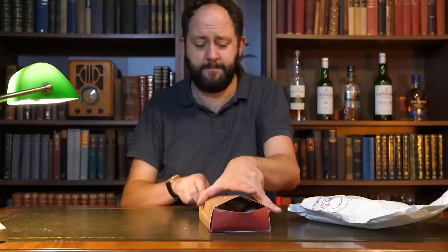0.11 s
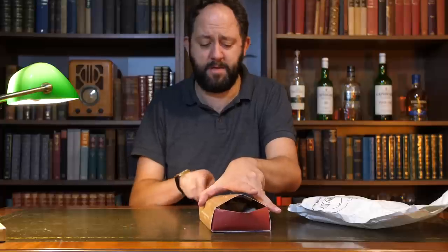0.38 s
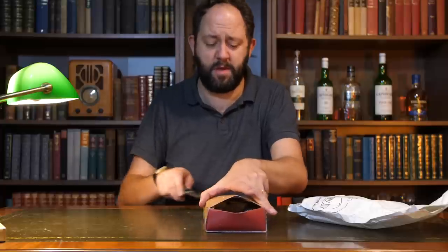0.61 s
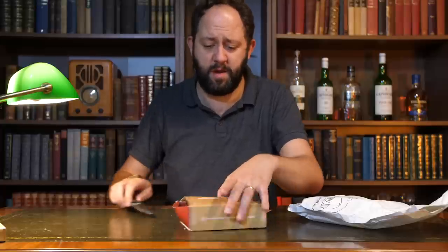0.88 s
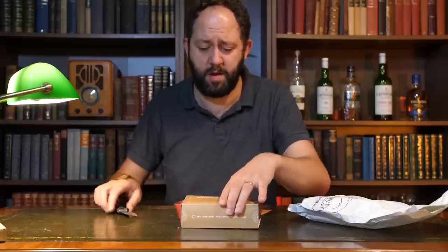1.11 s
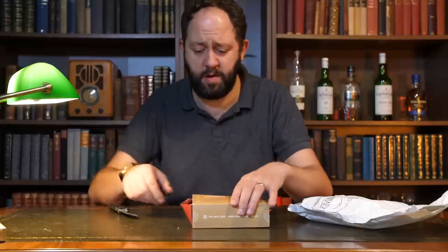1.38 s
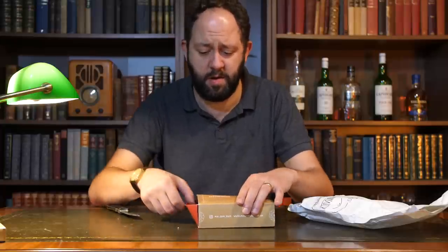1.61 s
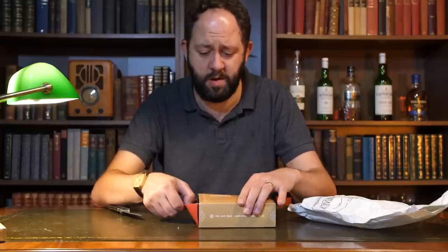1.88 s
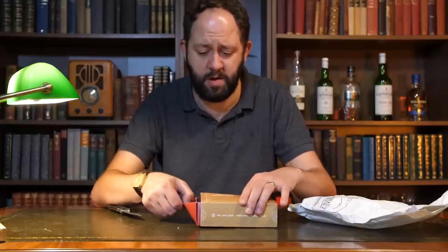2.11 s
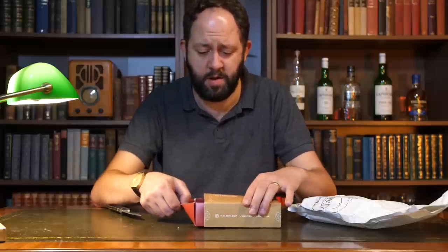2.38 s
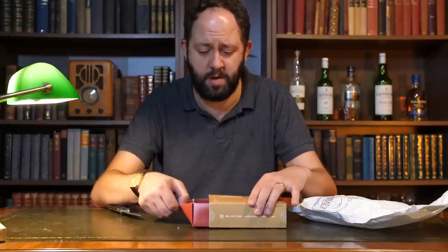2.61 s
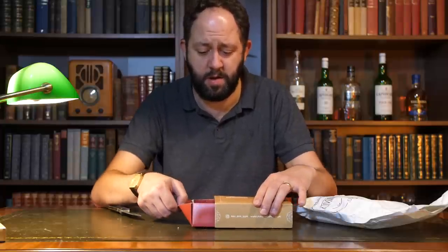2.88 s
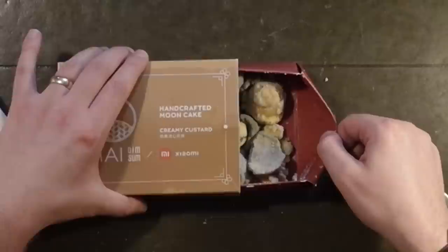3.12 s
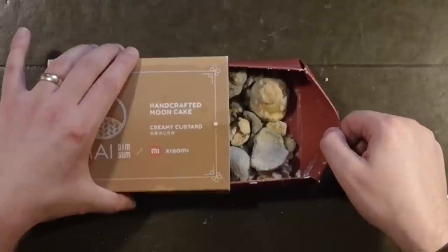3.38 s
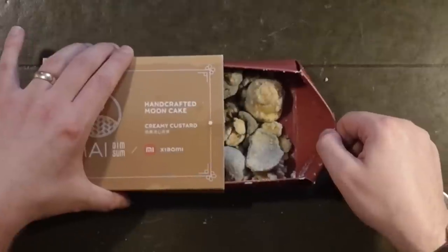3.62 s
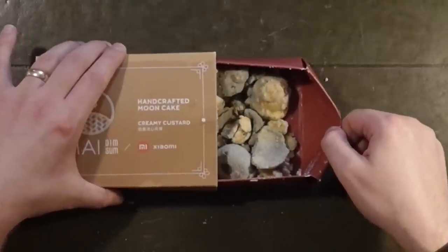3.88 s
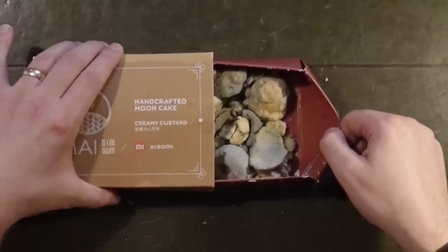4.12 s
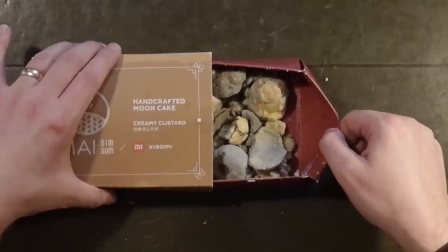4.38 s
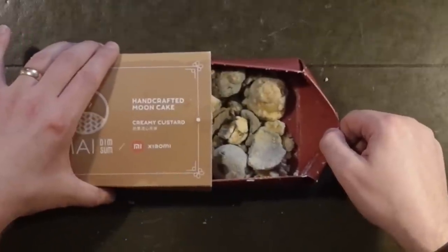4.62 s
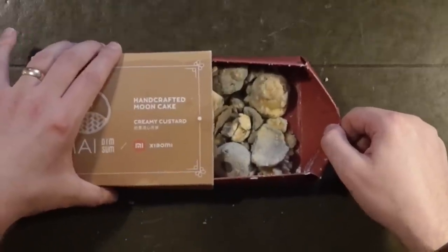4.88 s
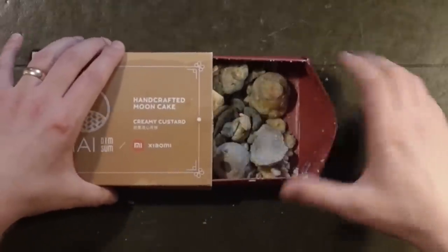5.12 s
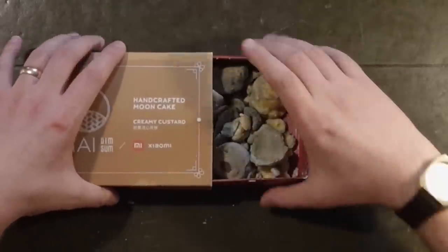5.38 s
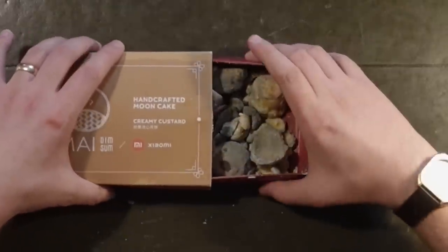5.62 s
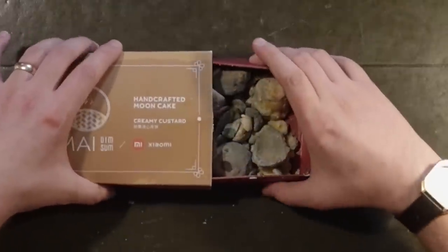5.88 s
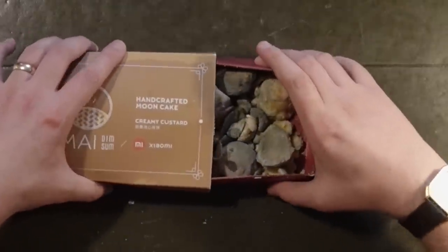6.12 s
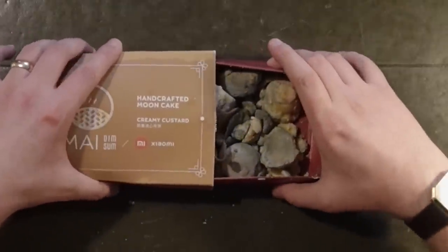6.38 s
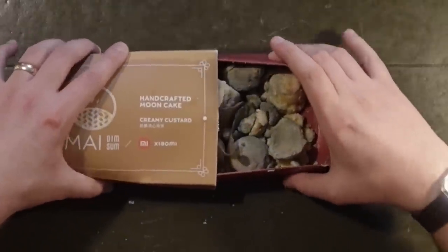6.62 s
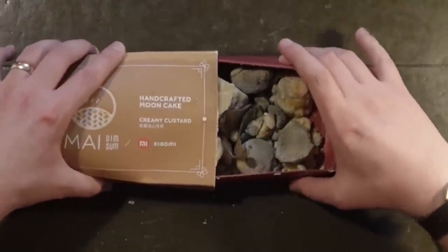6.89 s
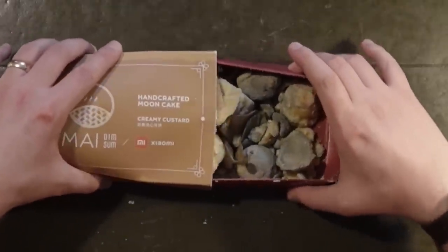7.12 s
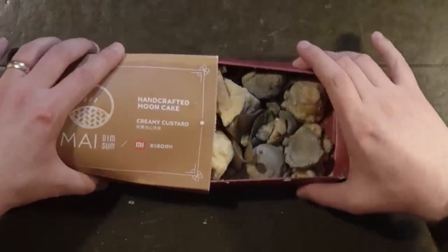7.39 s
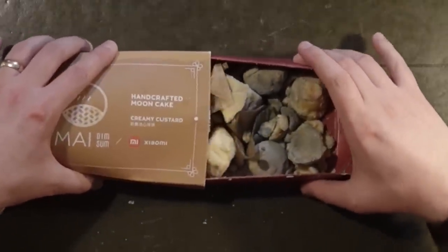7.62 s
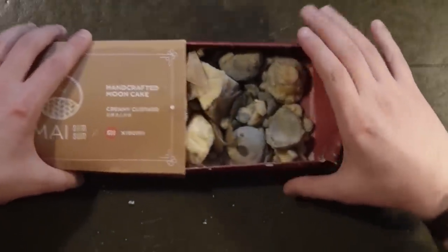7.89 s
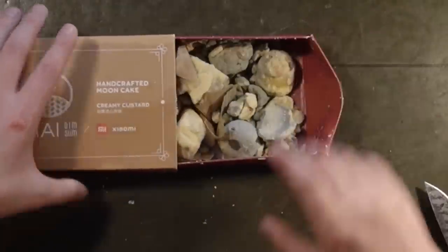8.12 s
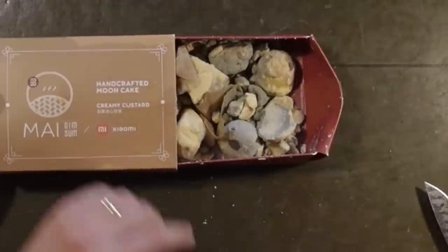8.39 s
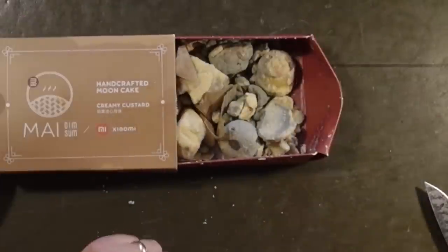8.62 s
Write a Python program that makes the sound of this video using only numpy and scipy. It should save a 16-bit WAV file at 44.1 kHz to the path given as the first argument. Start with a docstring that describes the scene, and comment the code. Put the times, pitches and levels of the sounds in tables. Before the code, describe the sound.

Close up on a wooden desk, a cardboard box is handled with airy rubbing and light taps, then lands with a low woody thud and rattle. Quiet card scuffs follow. Sharp catches and short scrapes then come in bursts as a tight tray slides out, ending in a cluster of clicks and a rising creak before near silence. Short room tail, low hiss, faint electronic whine.

```python
"""Cardboard box and sliding tray

A cardboard box is turned and set down on a wooden desk, then its tray is pulled out of the sleeve in jerks.
Rubbed card is noise shaped by resonances; catches, squeaks and a creak are slips ringing the card.
Blows and leaning hands excite the desk as decaying modes, a rattle, a low shake and a hum.
A fingertip drags over a flap, a short room tail follows, and steady hiss and a faint whine lie beneath."""
import sys
import numpy as np
from scipy import signal
from scipy.fft import rfft, irfft
from scipy.io import wavfile
from scipy.ndimage import uniform_filter1d

SR = 44100
rng = np.random.default_rng(int(sys.argv[2]) if len(sys.argv) > 2 else 0)


def store_pcm(level_fs):
    """Save levels as 16-bit WAV."""
    pcm = np.round(np.clip(level_fs, -1, 1) * 32767).astype(np.int16)
    wavfile.write(sys.argv[1], SR, np.atleast_2d(pcm).T)


def elevation(decibels):
    """Turn decibel levels (scalar or array-like) into linear amplitude ratios."""
    levels = np.asarray(decibels, float)
    return 10 ** (levels / 20)


N = 386316  # length in samples

# Resonances of the rubbed card, tray deep in the sleeve and half way out.
# Each row: frequency in Hz, width in Hz, relative level in dB (the deep curve is sharpened later).
DEEP_RINGS = [(680, 220, -5.5), (1900, 670, 3.5), (2800, 720, 6), (4130, 350, 4.5), (4920, 1000, -1.5)]
OUT_RINGS = [(1800, 610, 6.5), (2930, 400, 4.5), (4190, 1160, 0)]
# Resonances of the paper surface. Each row: frequency in Hz, width in Hz, relative level in dB.
PAPER_FIZZ = [(6450, 870, -2), (7700, 1200, -2), (12580, 1600, -7.5)]
# Hands turn the box on the desk; pressing sounds hollow, skimming airy.
# Each row: time in seconds, level in dB, pressure from 0 to 1.
TURN = [(0.0, -75.5, 0.98), (0.4, -51, 0.91), (0.52, -59, 0.81), (0.68, -62, 0.37), (0.85, -59, 0.3),
        (1.05, -67, 0.2), (1.45, -66, 0.1), (1.7, -72, 0.62), (1.9, -94, 0.63)]
# The tray slides for a while.
# Each row: start in seconds, length in seconds, first level in dB, last level in dB, panel ring in Hz.
SLIDES = [(2.104, 1, -61.5, -75.5, 2215), (3.285, 0.16, -62, -48.5, 1980), (3.8, 0.15, -46, -44.5, 1980),
          (5.028, 0.029, -59.5, -60, 1700), (6.157, 0.052, -45, -43.5, 1940),
          (6.337, 0.075, -50.5, -45.5, 1700), (6.577, 0.043, -44.5, -44.5, 2750),
          (6.762, 0.029, -43.5, -46.5, 3270), (7.257, 0.11, -45.5, -56.5, 1900),
          (7.462, 0.1, -44, -47.5, 2320), (7.767, 0.182, -65, -42, 2400)]
# Short scuffs of the card. Each row: time of the peak in seconds, rise over 20 dB in ms (at least 3 is used),
# fall over 20 dB in ms, peak level in dB, panel ring in Hz.
SCUFFS = [(0.485, 200, 31, -53.5, 1360), (0.574, 150, 206, -52, 1470), (0.916, 137, 185, -54.5, 3145),
          (1.95, 179, 111, -61.5, 1390), (2.18, 145, 248, -62, 1750), (2.47, 249, 210, -57, 2600),
          (2.67, 222, 296, -57, 2580), (3.08, 900, 38.5, -59, 1934), (3.584, 359.5, 303, -66.5, 1980),
          (4.1, 417, 460, -64.5, 1890), (4.132, 15, 50, -44.5, 1890), (4.949, 64, 402, -70, 2174),
          (5.285, 51, 210, -70, 1900), (5.447, 85, 500, -66.5, 2630), (6.026, 83, 78, -55.5, 1050),
          (6.808, 2.5, 53, -31, 3030), (6.96, 35, 69, -41, 2700), (7.146, 30, 39, -36.5, 1900),
          (7.223, 200, 32, -51.5, 1630), (7.615, 59, 78, -45, 1830), (7.911, 266, 76, -51, 2640),
          (8.075, 207, 63, -50.5, 2820), (8.244, 10, 33, -56, 2510)]
# Hands lean on the desk. Each row: time in seconds, level of the low shake in dB, level of the hum in dB.
LEAN = [(0, -63, -73.5), (.34, -63, -45), (.5, -57, -37.5), (.9, -60.5, -70), (1.7, -65, -60.5),
        (2.3, -74.5, -86.5), (2.9, -75, -81), (3.2, -70, -72), (4.2, -56, -71.5), (4.5, -72, -75),
        (5.9, -63, -72), (6.25, -53.5, -50.5), (7.1, -53, -64.5), (7.5, -62, -63), (8.25, -64.5, -74),
        (8.76, -73, -77.5)]
# Low resonances of the shaken desk. Each row: frequency in Hz, width in Hz, relative level in dB.
DESK_SHAKE = [(54.7, 10, -4.5), (111.5, 8.7, -9)]
# Box and hand land on the desk.
# Each row: time in seconds, peak in dB before the low cut, nominal contact time in ms.
THUMPS = [(0.245, -37.5, 0.11), (0.391, -28, 0.16), (0.439, -32.5, 0.17), (0.477, -27, 0.07),
          (0.709, -45, 0.23), (1.017, -24.5, 0.45), (1.064, -11.5, 0.39), (1.086, -7, 0.18),
          (1.616, -53, 0.44)]
# Modes of the desk. Each row: frequency in Hz, mean relative level in dB, t60 in seconds.
DESK_MODES = [(75.6, -5.5, 0.5), (99, -5, 0.42), (119.1, 1.5, 0.18), (151.95, 3, 0.73), (160, -10.5, 1.2),
              (282, -5, 0.22), (372, -2.5, 0.15), (472.7, -6.5, 0.26), (614, -8, 0.14), (849, -11, 0.14)]
# Dense rattle of box and contents after a thump.
# Each row: frequency in Hz, then relative level in dB (first table) or t60 in seconds (second).
RATTLE_LEVEL = [(50, -69.5), (100, 1.5), (400, 8), (1000, 2.5), (2000, -2), (5000, -31)]
RATTLE_T60 = [(100, 0.27), (300, 0.18), (1500, 0.15)]
# The card catches and lets go. Each row: time in seconds, peak in dB, main ring in Hz.
SNAPS = [(0.392, -26.5, 1460), (0.393, -18, 455), (0.474, -25.5, 650), (0.709, -34, 620),
         (0.911, -36, 2480), (1.086, -25.5, 720), (1.448, -43.5, 2560), (1.629, -47.5, 1258),
         (2.103, -44.5, 1560), (3.126, -52.5, 1900), (3.261, -45, 1610), (3.574, -21, 1800),
         (3.804, -34.5, 930), (4.122, -18.5, 1800), (4.305, -36, 920), (4.731, -45, 1466),
         (5.058, -43, 1200), (5.291, -41, 1980), (5.511, -39.5, 1240), (5.82, -39.5, 1020),
         (6.156, -36, 1570), (6.343, -28, 1380), (6.576, -20.5, 1900), (6.764, -34, 1440),
         (7.061, -38.5, 1440), (7.168, -26, 1700), (7.468, -28.5, 1800), (7.583, -30, 1800),
         (7.599, -28, 1560), (7.61, -32, 1800), (7.648, -29, 1800), (7.661, -27.5, 1770),
         (7.998, -28, 1160), (8.127, -45.5, 615)]
# Rings of a snap. Each row: frequency and width as multiples of the main ring,
# relative level in dB before the snap's strength and sharpening act on it.
CARD_RINGS = [(0.501, 0.24, -16.5), (0.998, 0.32, 3.5), (1.746, 0.51, -6.5), (2.302, .6, -3),
              (4.3, 0.49, -2.5), (7.001, 1.5, -16.5)]
# An edge jams and squeaks, falling in pitch.
# Each row: start in seconds, length in seconds, relative level in dB, first and last pitch in Hz.
SQUEAKS = [(3.454, 0.0083, -34, 1900, 1530), (3.953, 0.017, -25, 1800, 788), (4.132, 0.017, -27, 1057, 900),
           (4.148, 0.0089, -27.5, 2050, 1530), (6.806, 0.0155, -34, 3350, 3065),
           (6.808, 0.023, -33, 2310, 1670)]
# A fingertip drags over a loose flap.
# Each row: start in seconds, length in seconds, rms level in dB before the fades.
DRAGS = [(4.841, 0.052, -52.5), (5.728, 0.14, -54.5)]
# Modes of the flap. Each row: frequency in Hz, width in Hz, relative level in dB before sharpening.
FLAP_MODES = [(623, 110, -1), (985, 120, -1), (1710, 540, 1.5)]
# Stick and slip of the tray. Each row: time in seconds, slips per second, mean peak of a bare slip in dB.
CREAK = [(7.7645, 62, -26), (7.8, 88, -30.5), (7.855, 110, -26.5), (7.883, 230, -31.5), (7.905, 290, -28.5),
         (7.93, 200, -33), (7.96, 130, -39)]
# Tray and paper surface join the creak. Each row: frequency in Hz, width in Hz, level in dB re the slips.
CREAK_BODY = [(270, 100, 9.5), (13600, 1700, 5)]
# Decay of the room. Each row: frequency in Hz, t60 in seconds.
ROOM_T60 = [(200, 0.41), (2000, 0.13), (12000, 0.16)]
# Spectra of the common hiss and of the opposed part. Each row: frequency in Hz, relative density in dB.
HISS_SPECTRUM = [(76, -31.5), (130, -12.5), (589, -18), (1080, -26), (3910, -27), (16000, -26.5)]
SIDE_SPECTRUM = [(100, -5.5), (1030, -11), (16000, -3)]
# Hiss and whine dip briefly. Each row: centre in seconds, half length in seconds, depth in dB.
HISS_DIPS = [(2.043, .05, -5.5), (3.193, 0.19, -6)]

OUT_S = 3.607  # the tray starts to sound half way out (s)
TURNED_S, AIR_DB = 1.5, -2  # hands slide over the glossy box until here (s), with this much more air (dB)
TURN_RING_HZ = 1700
HOLLOW_DB, AIRY_DB = (-17.5, 10), (-1.5, -14)  # body and fizz re level, skimming and pressed
ATTACK_S, STOP_DB_PER_S = 0.018, 493.5
SETTLE_DB, SETTLE_DB_PER_S = -13.5, 132  # after a slide the card creeps on, softly
MEDIUM_DB, MEDIUM_HZ = -50, 1900  # reference stroke
BODY_DB, FIZZ_DB = (-12.5, -6), (-14, -12)  # re level in a medium stroke, tray deep and half way out
BODY_SLOPE, FIZZ_SLOPE = -0.29, -0.088  # dB gained per dB of a stronger stroke
BODY_DB_PER_OCTAVE, FIZZ_DB_PER_OCTAVE = -4.5, 4  # a slacker panel rings lower, hollower and duller
HUM_HZ, HUM_WIDTH_HZ = 157.6, 5.8
DESK_LOW_HZ = 66.4  # the desk radiates little below this
CREAK_HZ = 1800
ROOM_DB = -13.5
MIC_LOW_HZ = 41.4
HISS_DB, SIDE_DB = -70.5, -75  # rms outside the dips
WHINE_HZ = 1000.3
WHINE_DB, WHINE_FALL_DB = -84, -0.2014  # level, and change per square of the multiple


def evened(x):
    """Normalisation: scales a signal to rms 1."""
    return x / np.sqrt(np.mean(x ** 2) + 1e-20)


def read(points, hz):
    """Interpolation of a table on a logarithmic frequency axis."""
    f, value = np.transpose(points)
    return np.interp(np.log(hz + 1), np.log(f + 1), value)


def add(mix, s, sound):
    """Superposition: adds a sound to the mix at s seconds."""
    part = mix[round(s * SR):][:len(sound)]
    part += sound[:len(part)]


def coloured(x, gain):
    """Linear filtering: multiplies the spectrum by a gain given as a function of Hz."""
    return irfft(rfft(x) * gain(np.fft.rfftfreq(len(x), 1 / SR)), len(x))


def peaks(modes):
    """Resonance: the powers of several resonance curves add."""
    return lambda hz: np.sqrt(sum(elevation(db) ** 2 / (1 + (2 * (hz - f) / w) ** 2) for f, w, db in modes))


def between(lo_hz, hi_hz):
    """Band limiting: gain curve of a band with steep sides."""
    return lambda hz: 1 / np.sqrt((1 + (lo_hz / (hz + 1)) ** 8) * (1 + (hz / hi_hz) ** 8))


def curve(rows, column):
    """Linear interpolation: one column of a table at every sample."""
    rows = np.array(rows)
    return np.interp(np.arange(N) / SR, rows[:, 0], rows[:, column])


def resonate(x, hz, width):
    """Heterodyning: a resonance follows the curve hz by shifting down, smoothing and shifting back."""
    turn = np.exp(2j * np.pi * np.cumsum(hz) / SR)
    r = np.exp(-np.pi * width / SR)
    return 2 * (turn * signal.lfilter([1 - r], [1, -r], x / turn)).real


def slide_shape(t, s, length, first_db, last_db):
    """Sliding friction: level in dB rises at the start, drifts while held, then stops and settles."""
    held_db = np.interp(t, [s - 4 * ATTACK_S, s - ATTACK_S, s + ATTACK_S, s + length],
                        [-140, first_db - 32, first_db, last_db])
    after = np.maximum(t - s - length, 0)
    fall_db = np.maximum(-STOP_DB_PER_S * after, SETTLE_DB - SETTLE_DB_PER_S * after)
    return held_db + fall_db * (after > 0)


def scuff_shape(t, s, rise_ms, fall_ms, db):
    """Exponential growth and decay: level in dB climbs straight to its peak and falls straight."""
    before = (s - t) / max(rise_ms / 1000, .003)
    after = (t - s) / max(fall_ms / 1000, .003)
    return db - 20 * np.maximum(before, after)


def stroke_colour(s, db, hz):
    """Radiation of a panel: body and fizz in dB depend on stroke strength, ring and tray position."""
    stronger_db, octaves = db - MEDIUM_DB, np.log2(hz / MEDIUM_HZ)
    body_db = BODY_DB[int(s > OUT_S + .2)] + BODY_SLOPE * stronger_db + BODY_DB_PER_OCTAVE * octaves
    fizz_db = FIZZ_DB[int(s > OUT_S)] + FIZZ_SLOPE * stronger_db + FIZZ_DB_PER_OCTAVE * octaves
    return body_db, fizz_db, hz


def strokes():
    """Power addition: stroke powers sum, and weight body, fizz and panel ring, at every sample."""
    t = np.arange(0, N / SR + .002, .001)
    shapes, colours = [], []
    for s, length, first_db, last_db, hz in SLIDES:
        shapes.append(slide_shape(t, s, length, first_db, last_db))
        colours.append(stroke_colour(s, max(first_db, last_db), hz))
    for s, rise_ms, fall_ms, db, hz in SCUFFS:
        shapes.append(scuff_shape(t, s, rise_ms, fall_ms, db))
        colours.append(stroke_colour(s, db, hz))
    power = [elevation(shape) ** 2 for shape in shapes]
    stroke_power = np.sum(power, 0)
    body_db, fizz_db, ring_hz = np.transpose(colours) @ power / (stroke_power + 1e-30)

    s, turn_db, pressure = np.transpose(TURN)
    turn_power = elevation(np.interp(t, s, turn_db, right=-140)) ** 2
    pressure = np.clip(np.interp(t, s, pressure), 0, 1)
    total = stroke_power + turn_power
    turning = t < s[-1]
    body_db[turning] = np.interp(pressure, (0, 1), HOLLOW_DB)[turning]
    fizz_db[turning] = np.interp(pressure, (0, 1), AIRY_DB)[turning]
    ring_hz += turn_power / total * (TURN_RING_HZ - ring_hz)
    curves = (10 * np.log10(total), body_db, fizz_db, ring_hz)
    return [np.interp(np.arange(N) / SR, t, values) for values in curves]


def fibre_slips():
    """Random excitation: countless tiny fibre slips, bunched in time and patchy in colour."""
    size = elevation(3.5 * np.minimum(rng.exponential(1, N), 4)) * (rng.random(N) < 2000 / SR)
    clumps = elevation(1.2 * evened(uniform_filter1d(rng.standard_normal(N), 300)))
    slips = clumps * (0.49 * evened(size * rng.standard_normal(N)) + rng.standard_normal(N))
    z = signal.stft(slips, nperseg=256, noverlap=192)[2]
    patches = uniform_filter1d(rng.standard_normal(z.shape[::-1]).T, 3, 0)
    patches = uniform_filter1d(patches, 14, 1)
    # the rubbed spot keeps changing colour
    return signal.istft(z * elevation(2.6 * evened(patches)), nperseg=256, noverlap=192)[1][:N]


def rub():
    """Friction noise: fibre slips excite the card; sleeve, body and fizz follow the stroke."""
    slips = fibre_slips()
    level_db, body_db, fizz_db, ring_hz = strokes()
    out_share = np.clip((np.arange(N) / SR - OUT_S) / 1.07, 0, 1)
    deep = coloured(slips, lambda hz: peaks(DEEP_RINGS)(hz) ** 1.2)
    card = (1 - out_share) * deep + out_share * coloured(slips, peaks(OUT_RINGS))
    # the held panel bends, so its ring wanders
    flex = 1 + 0.033 * evened(uniform_filter1d(rng.standard_normal(N), 900))
    card += resonate(slips, ring_hz * flex, 520)

    turning = np.clip((TURNED_S - np.arange(N) / SR) / 0.11, 0, 1)
    broad = np.maximum(turning, 0.14 + out_share)  # deep in the sleeve its own low ring stands out
    bands = [(card, 900, 6000),
             (broad * slips + elevation(-9.5) * card, 200, 900),
             (coloured(slips, peaks(PAPER_FIZZ)), 6000, 15800)]
    parts = (coloured(part, between(lo_hz, hi_hz)) for part, lo_hz, hi_hz in bands)
    # each band is levelled over a quarter second
    sleeve, body, fizz = (part / np.sqrt(uniform_filter1d(part ** 2, SR // 4)) for part in parts)
    fizz += turning * elevation(AIR_DB) * evened(coloured(slips, between(9000, 15800)))
    # the fizz needs speed: it comes late and leaves early
    speed_db = np.minimum(level_db, uniform_filter1d(level_db, 1500))
    return elevation(level_db) * (sleeve + elevation(body_db) * body) + elevation(speed_db + fizz_db) * fizz


def lean():
    """Forced vibration: leaning hands shake the desk low, in lumps, and keep it humming."""
    lumps = elevation(3.2 * evened(uniform_filter1d(rng.standard_normal((2, N)), 3000, axis=1)))
    shake = coloured(rng.standard_normal(N), peaks(DESK_SHAKE))
    shake = coloured(shake, between(25, 125))
    hum = coloured(rng.standard_normal(N), peaks([(HUM_HZ, HUM_WIDTH_HZ, 0)]))
    hum = coloured(hum, between(180, 190))  # thins the lower skirt of the resonance
    return elevation(curve(LEAN, 1)) * evened(lumps[0] * shake) + elevation(curve(LEAN, 2)) * evened(lumps[1] * hum)


def ring(modes):
    """Free vibration: dying sines after one blow; a close pair beats."""
    t = np.arange(SR) / SR
    return sum(elevation(db - 60 * t / t60) * np.sin(2 * np.pi * hz * t) for hz, db, t60 in modes)


def thumps():
    """Impact: a short push, sharper when brief, drives the modes of the desk and a dying rattle."""
    out = np.zeros(N)
    t = np.arange(round(.03 * SR)) / SR
    hz, frame_s = np.fft.rfftfreq(512, 1 / SR), np.arange(200) * 128 / SR
    dying = elevation(read(RATTLE_LEVEL, hz)[:, None] - 60 * frame_s / read(RATTLE_T60, hz)[:, None])
    for (s, db, contact_ms), spot in zip(THUMPS, rng.random((len(THUMPS), len(DESK_MODES)))):
        push = t ** 2 * np.exp(-t / (0.00085 * max(contact_ms, .03)))
        # each spot favours other modes
        struck = [(f, mode_db + 3.4 * (c - .5), t60) for (f, mode_db, t60), c in zip(DESK_MODES, spot)]
        response = ring(struck)
        phases = np.exp(2j * np.pi * rng.random(dying.shape))
        rattle = signal.istft(dying * phases, nperseg=512, noverlap=384)[1]
        share = min(1.5, 0.31 / contact_ms)  # soft blows rattle less
        response[:len(rattle)] += share * abs(response).max() * rattle / abs(rattle).max()
        response[0] += 13.0 * abs(response).max()  # the knock itself, heard straight
        sound = signal.fftconvolve(push, response)
        add(out, s, elevation(db) * sound / abs(sound).max())
    return signal.sosfilt(signal.butter(2, DESK_LOW_HZ, "high", fs=SR, output="sos"), out)


def snap(hz, db, jolts, sharp=1.14):
    """Stress release: a slip builds over a millisecond in uneven jolts through the damped rings of the card."""
    t = np.arange(len(jolts)) / SR
    burst = np.pad(jolts * t * np.exp(-t / 0.0008), (30, 400))
    # flatten the spectrum, so the jolts favour no pitch much
    burst = coloured(burst, lambda f: 1 / np.sqrt(abs(rfft(burst)) + 1e-9))
    # weak snaps are duller
    rings = peaks([(k * hz, w * hz, ring_db + 0.11 * k * db) for k, w, ring_db in CARD_RINGS])
    sound = coloured(burst, lambda f: rings(f) ** sharp)
    return elevation(db) * sound / abs(sound).max()


def snaps():
    """Transient excitation: single catches of the card let go."""
    out = np.zeros(N)
    for (s, db, hz), jolts in zip(SNAPS, rng.standard_normal((len(SNAPS), 160))):
        add(out, s - 30 / SR, snap(hz, db, jolts))
    return out


def squeaks():
    """Frictional oscillation: a jammed edge gives a gliding tone with its octave, roughened."""
    out = np.zeros(N)
    for s, length, db, first_hz, last_hz in SQUEAKS:
        count = round(length * SR)
        phase = 2 * np.pi * np.cumsum(np.geomspace(first_hz, last_hz, count)) / SR
        tone = np.sin(phase) + 0.18 * np.sin(2 * phase)
        rough = 1 + 0.47 * evened(uniform_filter1d(rng.standard_normal(2000), 40))[:count]
        add(out, s, elevation(db) * 0.31 * tone * rough * signal.windows.tukey(count, .6))
    return out


def drags():
    """Skin friction: coarse, uneven slips ring the few modes of the flap."""
    size = elevation(3 * np.minimum(rng.exponential(1, N), 4)) * (rng.random(N) < 3000 / SR)
    slips = size * rng.standard_normal(N)
    rung = coloured(slips, lambda hz: peaks(FLAP_MODES)(hz) ** 1.4)
    out = np.zeros(N)
    for s, length, db in DRAGS:
        part = rung[round(s * SR):][:round(length * SR)]
        add(out, s, elevation(db) * evened(part) * np.sqrt(np.hanning(len(part))))
    return out


def creak():
    """Stick-slip: the tray slips at a rate that climbs, then drops; the slips sound much alike."""
    s, rate, db = np.transpose(CREAK)
    t = np.arange(s[0], s[-1], 1 / SR)
    turns = np.cumsum(np.interp(t, s, rate)) / SR
    slip_times = np.r_[t[0], t[1:][np.diff(np.floor(turns)) > 0]]
    alike, out = rng.standard_normal(160), np.zeros(N)
    for when, draws in zip(slip_times, rng.standard_normal((len(slip_times), 162))):
        late, strong, own = draws[0], draws[1], draws[2:]
        uneven = 1e-6 * late * np.interp(when, s, rate)  # quick slips keep time less well
        slip_db = np.interp(when, s, db) + 0.43 * strong
        slip = snap(CREAK_HZ * (1 + .04 * late), slip_db, alike + 0.4 * own, sharp=1.0)
        add(out, when + uneven - 30 / SR, slip)
    return out + coloured(out, peaks(CREAK_BODY))


def room(x):
    """Reverberation: sparse echoes of random sign, each band dying at its own speed."""
    taps = np.zeros(SR // 2)
    at = np.arange(150, len(taps) - 20, 20)
    taps[at + rng.integers(0, 20, len(at))] = rng.choice([-1., 1.], len(at))
    hz, t, z = signal.stft(taps, SR, nperseg=256)
    tail = signal.istft(z * elevation(-60 * t / read(ROOM_T60, hz)[:, None]), SR, nperseg=256)[1]
    return elevation(ROOM_DB) * signal.fftconvolve(x, tail / np.linalg.norm(tail))[:N]


def scene():
    """Superposition: everything on the desk, heard from one spot, alike in both channels."""
    near = rub() + thumps() + snaps() + squeaks() + drags() + creak()
    return np.tile(near + room(near) + lean(), (2, 1))


def hiss():
    """Random noise: shaped hiss, with a weaker part opposed in the two channels."""
    common = evened(coloured(rng.standard_normal(N), lambda hz: elevation(read(HISS_SPECTRUM, hz))))
    side = evened(coloured(rng.standard_normal(N), lambda hz: elevation(read(SIDE_SPECTRUM, hz))))
    return elevation(HISS_DB) * common + np.outer([1, -1], elevation(SIDE_DB) * side)


def whine():
    """Harmonic series: eight multiples of one tone, wavering together in level."""
    t = np.arange(N) / SR
    waver = elevation(2.6 * evened(uniform_filter1d(rng.standard_normal(N), 3000)))
    tones = np.zeros(N)
    for k in range(1, 9):
        tone = np.sin(2 * np.pi * (k * WHINE_HZ * t + rng.random()))
        tones += elevation(WHINE_DB + WHINE_FALL_DB * k ** 2) * tone
    return waver * tones


def band_limit(x):
    """A steep low-pass at the top of the band."""
    return signal.sosfilt(signal.butter(12, 15830, fs=SR, output="sos"), x)


def record(dry):
    """Linear pickup: a bass cut, then hiss and whine that dip together."""
    t = np.arange(N) / SR
    heard = signal.sosfilt(signal.butter(5, MIC_LOW_HZ, "high", fs=SR, output="sos"), dry)
    dips = elevation(sum(db * np.exp(-((t - s) / half) ** 4) for s, half, db in HISS_DIPS))
    mix = heard + dips * (hiss() + whine())
    return band_limit(mix)


dry = scene()
out = record(dry)
store_pcm(out)
```